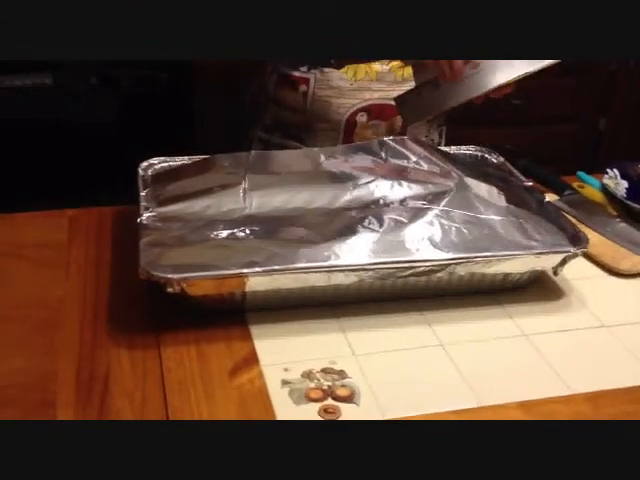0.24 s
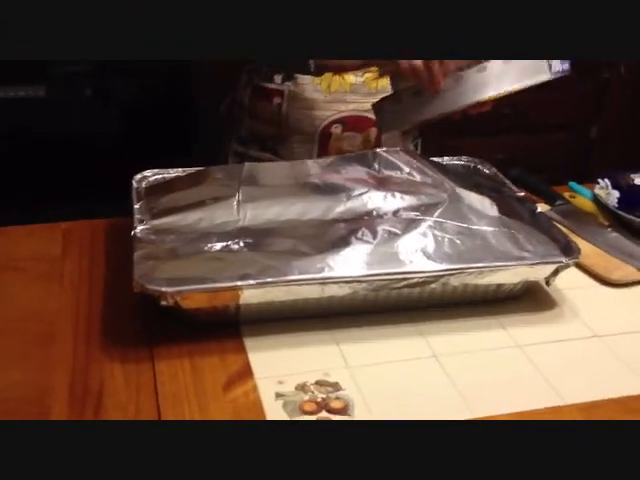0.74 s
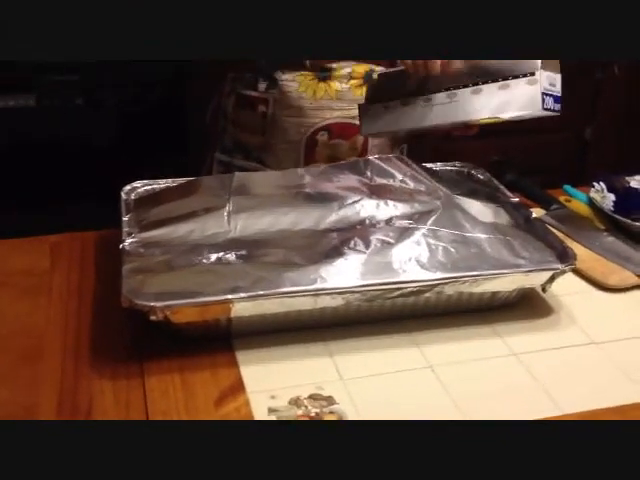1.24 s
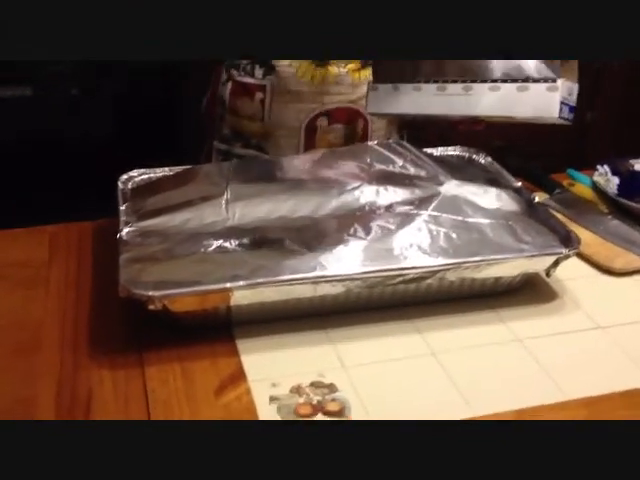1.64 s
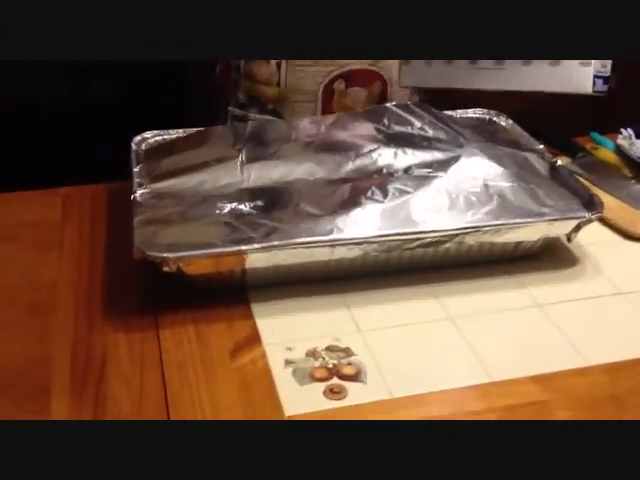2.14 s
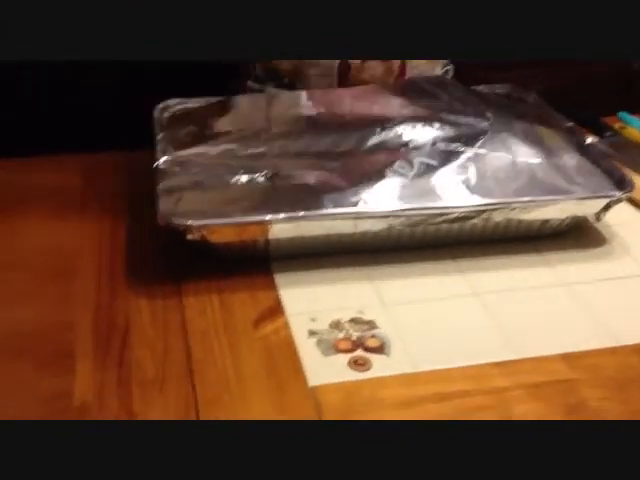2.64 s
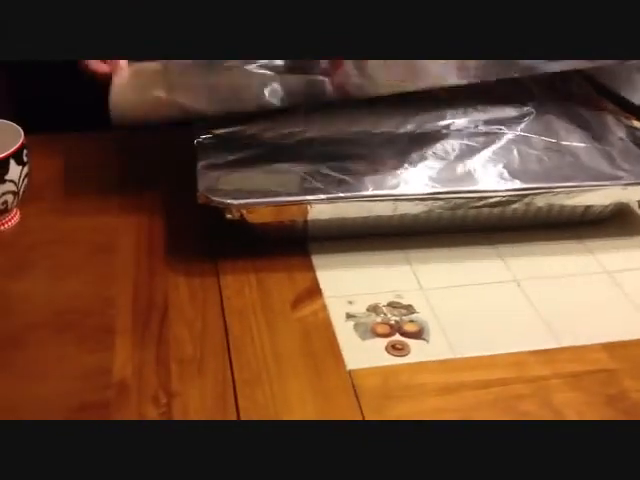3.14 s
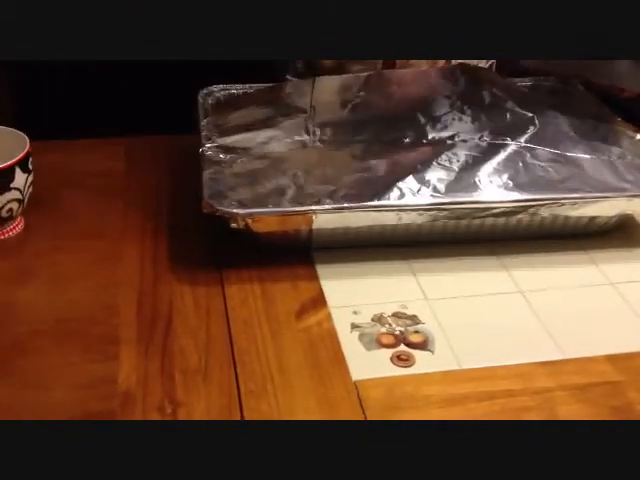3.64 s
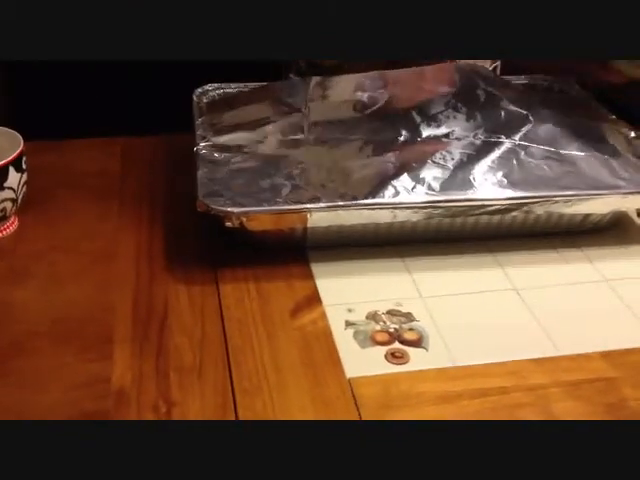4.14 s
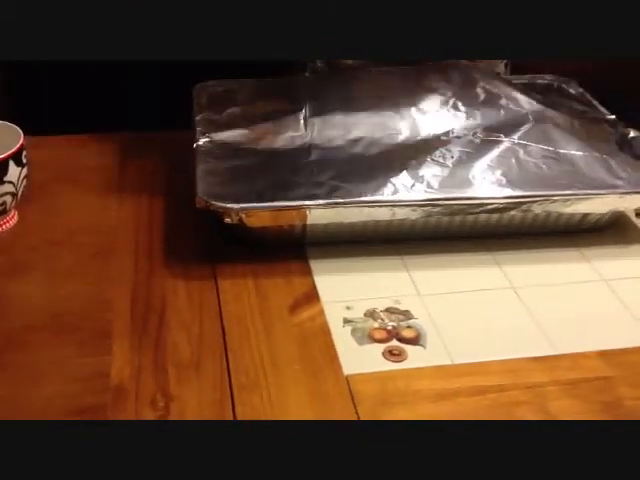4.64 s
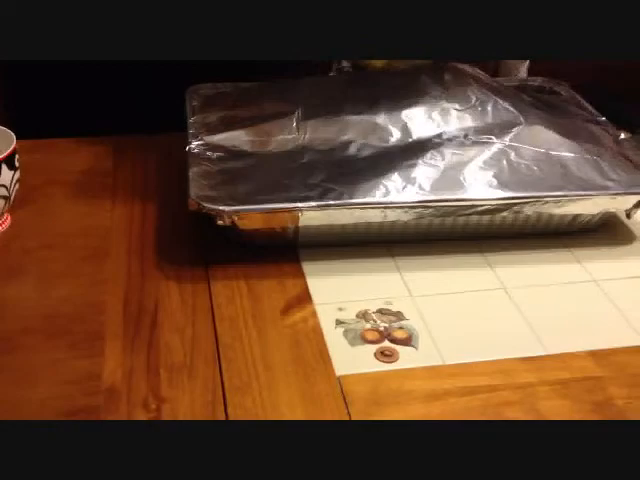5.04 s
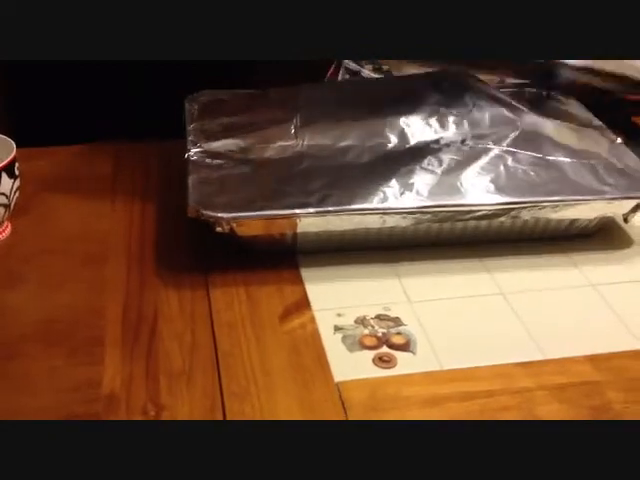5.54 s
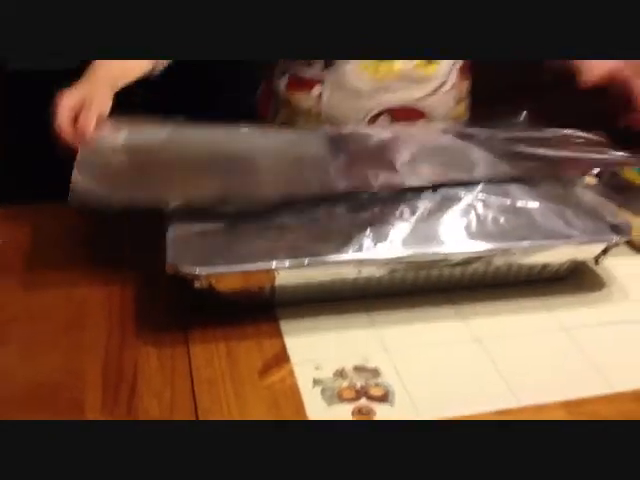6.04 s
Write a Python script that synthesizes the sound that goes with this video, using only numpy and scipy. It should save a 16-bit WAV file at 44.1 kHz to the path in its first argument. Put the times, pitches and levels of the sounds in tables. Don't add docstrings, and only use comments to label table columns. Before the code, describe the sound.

Faint cardboard ticks and fumbling, then aluminium foil hisses off its roll and is shaken in bright, crackling bursts in a small hard kitchen.

```python
import sys
import numpy as np
from scipy import signal
from scipy.fft import rfft, irfft, dct, next_fast_len
from scipy.io import wavfile
from scipy.ndimage import uniform_filter1d

SR = 44100
rng = np.random.default_rng(int(sys.argv[2]) if len(sys.argv) > 2 else 0)


def pcm_store(signal):
    levels = np.round(np.clip(np.atleast_2d(signal), -1, 1) * 32767)
    wavfile.write(sys.argv[1], SR, levels.astype(np.int16).T)


def field_ratio(decibels):
    return 10 ** (np.asarray(decibels, dtype=float) / 20)


N = 277830

# (time [s], crackle level [dB])
PULL = [(0, -68), (.22, -68), (.5, -57), (.65, -57), (.74, -65), (.95, -55), (1.07, -69), (1.23, -58),
        (1.385, -52), (1.45, -38), (1.56, -28), (2.15, -22.5), (2.37, -23.5), (2.45, -28.5), (2.7, -33),
        (3.08, -35), (5.1, -37), (6.3, -35)]
# (peak time [s], crackle level [dB], rise by 10 dB [s], fall by 10 dB [s],
# sheet body re crackle [dB])
FUMBLES = [
    (0, -45, .02, .022, 1),
    (.096, -50, .012, .012, -6),
    (.372, -42, .02, .06, -2),
    (.79, -47, .025, .1, -4),
    (.848, -38, .01, .04, -3),
    (1.11, -46, .006, .03, -7),
    (1.3, -58, .15, .15, 9),
    (1.398, -30, .008, .06, -5),
]
# (peak time [s], crackle level [dB], rise by 10 dB [s], fall by 10 dB [s],
# sheet body re crackle [dB])
SHAKES = [(1.9, -26, .02, .15, -10), (2.165, -24, .025, .06, -10), (2.56, -31, .1, .15, -8),
          (3.21, -23.5, .06, .15, -12), (3.306, -22, .04, .05, -14), (3.4, -22.5, .1, .08, -12),
          (3.6, -15, .055, .1, -11.5), (3.746, -26, .07, .25, -7), (3.93, -25, .1, .15, -10),
          (4.094, -17.5, .2, .15, -12), (4.235, -20, .1, .095, -11), (4.4, -25.5, .02, .2, -13),
          (4.58, -18, .25, .11, -13), (4.74, -13.5, .035, .15, -7.5), (4.83, -14.5, .1, .12, -9),
          (4.936, -17.5, .1, .085, -12), (5.17, -35, .03, .06, -10), (5.27, -29.5, .06, .12, -11),
          (5.39, -28.5, .015, .12, -10), (5.55, -26, .05, .3, -9), (5.75, -29, .2, .15, -9),
          (5.95, -23, .08, .11, -12), (6.23, -26, .12, .6, -12)]
# (frequency [Hz], density [dB per Hz])
CRACKLE_SPECTRUM = [(1760, -41), (3000, -8.5), (4330, -2), (5690, 1.5), (8180, -2.5), (10000, -12.5),
                    (13000, -51), (22000, -120)]
# (frequency [Hz], density [dB per Hz])
BODY_SPECTRUM = [(280, -48.5), (480, -21), (590, -9), (652, -15.5), (710, -8.5), (1040, -6), (1890, 2.5),
                 (3000, -6.5), (3900, -32), (6600, -120)]
# (frequency [Hz], density [dB per Hz])
WOBBLE_SPECTRUM = [(90, -38.5), (140, -14), (200, -3.5), (280, -1.5), (360, 0.5), (450, -5), (520, -17),
                   (800, -50)]
# (time [s], treble lift [dB])
FACING = [(.3, -2), (.8, 3.5), (1.45, 4.5), (1.9, 2.5), (2.4, .5), (3.0, 1.5), (3.35, -1), (3.7, .3),
          (4.7, -0.5), (5.3, 0.7)]
DIP_DB = (-5.5, 0., 2.5, 0.)
DIP_S = (1.3, 1.6, 2.9, 3.8)

# (time [s], peak level [dB], low part re peak [dB])
TICKS = [(0.0944, -33.5, -12), (0.2478, -34, -5), (0.2828, -37, -2), (0.3072, -34, 0), (0.3521, -37, -4),
         (0.3695, -31, -6), (0.4724, -37, -15), (0.4968, -32, 1), (0.5307, -39, -10), (0.5707, -31, 3),
         (0.602, -35, 1), (0.634, -37, 3), (0.6594, -28, 2.5), (0.7667, -39, -8), (0.7903, -30.5, -11),
         (0.8145, -30, -7), (0.845, -23, -10), (0.9562, -34, -11), (1.1064, -34, -10), (1.191, -40.5, -13),
         (1.225, -43, -1), (1.2875, -42, -5), (1.3124, -41, -12), (1.3962, -27, -3)]
# (time [s], peak level [dB], low part re peak [dB])
SNAPS = [(1.4701, -27, -12), (1.497, -21.5, -14), (1.6566, -18, -25), (1.7609, -18.5, -21),
         (3.1803, -21, -8), (3.4989, -20.5, -20), (3.5164, -20.5, -11), (3.5528, -12.5, -20.5),
         (3.9182, -12, -21), (4.6927, -10.5, -8), (4.7252, -7, -11), (5.1507, -21, -29), (5.2342, -22, -20),
         (5.302, -30.5, 0), (5.3822, -21, -27), (5.434, -17, -14.5), (5.5238, -26, -22), (5.5423, -15, -30),
         (5.7354, -20, -21)]
# (frequency [Hz], density [dB per Hz])
SNAP_BRIGHT = [(1760, -32.5), (3000, -4), (4470, 3.5), (8380, -13.5), (9370, -14.5), (10000, -3.5),
               (13000, -54), (22000, -120)]
# (frequency [Hz], density [dB per Hz])
SNAP_LOW = [(290, -42), (500, -7.5), (1120, -3.5), (1540, -11), (1680, -1.5), (3000, -20.5), (3900, -56.5),
            (6600, -120)]
# (time [s], peak level [dB], pitch [Hz], t60 [s])
FLOPS = [(0.814, -40, 377, 0.12), (4.039, -36, 334, .1), (4.69, -33.5, 342, .12), (4.83, -31, 300, .12),
         (5.209, -39.5, 232.4, 0.09), (5.304, -32, 428, 0.15), (5.374, -29, 354, 0.1),
         (5.6, -38, 300, 0.13), (5.659, -34, 331, 0.118), (5.72, -38.5, 315.5, 0.14),
         (5.781, -35.5, 234, 0.12)]

# (frequency [Hz], t60 [s])
KITCHEN_T60 = [(300, 0.44), (2000, 0.39), (6000, 0.12), (10000, 0.2)]
# (frequency [Hz], level [dB])
HUM = [(118.6, -67.5), (213.6, -52)]
# (frequency [Hz], density [dB per Hz])
ROOM_TONE = [(24, -74.5), (40, -35.5), (96, -34), (156, -9.5), (211, -5.5), (279, -16), (452, -8.5),
             (520, -11.5), (1980, -22), (2870, -23.5), (4890, -23.5), (8120, -29.5), (10000, -64.5),
             (13000, -93), (22000, -120)]

# (time [s], step re block level [dB])
COARSENESS = [(1.1, -22), (1.6, -16), (2.9, -9), (4.9, -5), (5.1, -2.5)]
# (frequency [Hz], level [dB])
STEP_TILT = [(60, 0), (150, 0), (300, -2), (8000, -2)]
# (frequency [Hz], level [dB])
MASKING = [(150, 0), (300, 5), (600, 8), (1000, 10), (3300, 10.5), (4000, 6)]
EDGE_HZ = (9000, 10750, 10800, 10050)
EDGE_S = (0, .5, 1.6, 2.1)
TREBLE_HZ = (8600, 11200, 12000)
# (crackle level [dB], hiss level [dB])
HISS_FOLLOW = [(-74, -83), (-37, -47), (-21, -23.5), (-14, -21)]
# (time [s], level [dB])
HISS_BURSTS = [
    (0.1794, -73),
    (0.4978, -44),
    (0.5701, -63),
    (0.6584, -62),
    (0.9994, -68),
    (1.1039, -57),
]


def evened(x):
    return x / np.sqrt(np.mean(x ** 2) + 1e-20)


def read(points, hz):
    f, value = np.transpose(points)
    return np.interp(np.log(hz + 1), np.log(f + 1), value)


def at_times(points, t):
    return np.interp(t, *np.transpose(points))


def coloured(x, spectrum):
    hz = abs(np.fft.fftfreq(8192, 1 / SR))
    log_gain = np.log(field_ratio(np.maximum(read(spectrum, hz), -100)))
    phase = -signal.hilbert(log_gain).imag
    taps = np.fft.ifft(np.exp(log_gain + 1j * phase)).real[:4096]
    return signal.oaconvolve(x, taps / np.linalg.norm(taps))[:N]


def band(x, lo_hz, hi_hz):
    size = next_fast_len(N + SR)
    f = np.fft.rfftfreq(size, 1 / SR)
    return irfft(rfft(x, size) * (f > lo_hz) * (f < hi_hz), size)[:N]


def foil():
    wobble_db, wobble_per_db, rest_db = -19.5, 0.28, -63.0
    swell_db, swell_s = -13.0, 0.03
    crackle_db, body_db = handling()
    t = np.arange(N) / SR
    fine = creases(per_s=4000, spread_db=0.0, clump_db=0.54, ring_t60=0.005)
    coarse = creases(per_s=1200, spread_db=2.0, clump_db=0.76, ring_t60=0.03)
    crackle = coloured(fine + 0.6 * coarse, CRACKLE_SPECTRUM) * field_ratio(crackle_db)
    body = coloured(0.74 * fine + 0.69 * coarse, BODY_SPECTRUM) * field_ratio(body_db)

    swells = sum(field_ratio(db + swell_db) * np.exp(-((t - s) / swell_s) ** 2) for s, db, *_ in FLOPS)
    shaken = field_ratio(body_db + wobble_db + wobble_per_db * (body_db + 24.5))
    wobble = coloured(coarse, WOBBLE_SPECTRUM) * (shaken + field_ratio(rest_db) + swells)
    return field_ratio(-2.0) * facing(crackle + body + wobble, crackle_db)


def handling():
    body_re_crackle_db, slack_gain, firm_db = -8.5, -0.1, -34.5
    t = np.arange(0, N, 32) / SR
    pull_db = at_times(PULL, t)
    slack_db = np.minimum(pull_db - firm_db, 0)
    crackle = field_ratio(2 * pull_db)
    body = field_ratio(2 * (pull_db + body_re_crackle_db + slack_gain * slack_db))
    for s, db, rise_s, fall_s, body_db in FUMBLES + SHAKES:
        distance = np.where(t < s, (s - t) / rise_s, (t - s) / fall_s)
        stroke = field_ratio(2 * (db - 10 * distance))
        crackle = crackle + stroke
        body = body + stroke * field_ratio(2 * body_db)
    return [np.interp(np.arange(N) / SR, t, 10 * np.log10(power)) for power in (crackle, body)]


def creases(per_s, spread_db, clump_db, ring_t60):
    wander = uniform_filter1d(rng.standard_normal(N), size=500)
    clumps = evened(uniform_filter1d(wander, size=300))
    size = field_ratio(spread_db * np.minimum(rng.exponential(1, N), 4.2) + clump_db * clumps)
    size *= rng.random(N) < per_s / SR
    fade = field_ratio(-60 / ring_t60 / SR) ** 2
    power = signal.lfilter([1], [1, -fade], size ** 2)
    return evened(rng.standard_normal(N) * np.sqrt(power))


def facing(x, crackle_db):
    t = np.arange(N) / SR
    effort_db = uniform_filter1d(crackle_db, size=15000)
    top_db = np.maximum(0.29 * (effort_db + 24.5), -4.0) + at_times(FACING, t)
    dip_db = np.interp(t, DIP_S, DIP_DB)
    top = (field_ratio(top_db) - 1) * band(x, 7000, 12000)
    dip = (field_ratio(dip_db) - 1) * band(x, 2500, 3500)
    return x + top + dip


def snaps():
    length = 6000
    bright, low, flops = np.zeros((3, N + length))
    t = np.arange(length) / SR
    tail = field_ratio(-60 * t / 0.058)
    ring = (field_ratio(-60 * t / 0.018) + 0.5 * tail) * (1 - np.exp(-t / 0.0004))
    tick = field_ratio(-60 * t / 0.0035) + 0.18 * tail
    for s, db, low_db in TICKS + SNAPS:
        at = round(s * SR)
        rattle = rng.standard_normal(length)
        bright[at:at + length] += field_ratio(db - 10.0) * rattle * ring
        low[at:at + length] += field_ratio(db + low_db - 4.5) * rattle * tick

    rise = 1 - np.exp(-t / 0.0021)
    for s, db, hz, t60 in FLOPS:
        at = round(s * SR)
        flops[at:at + length] += field_ratio(db - 5.0 - 60 * t / t60) * rise * np.sin(2 * np.pi * hz * t)
    return coloured(bright, SNAP_BRIGHT) + coloured(low, SNAP_LOW) + flops[:N]


def kitchen(x):
    taps = np.zeros(SR // 2)
    at = np.arange(200, SR // 2 - 20, 20)
    taps[at + rng.integers(0, 20, len(at))] = rng.choice([-1., 1.], len(at))
    hz, t, z = signal.stft(taps, SR, nperseg=256)
    decay = field_ratio(-60 * t / read(KITCHEN_T60, hz)[:, None])
    tail = signal.istft(z * decay, SR, nperseg=256)[1]
    return signal.fftconvolve(x, tail / np.linalg.norm(tail))[:N]


def refrigerator():
    waver = evened(uniform_filter1d(rng.standard_normal(N), size=4000))
    turns = np.cumsum(1 + 0.015 * waver) / SR
    hum = sum(np.sqrt(2) * field_ratio(db + 0.33 * waver) * np.sin(2 * np.pi * hz * turns) for hz, db in HUM)
    return hum + field_ratio(-53.5) * coloured(rng.standard_normal(N), ROOM_TONE)


def scene():
    near = foil() + snaps()
    return np.tile(near + field_ratio(-9.5) * kitchen(near) + refrigerator(), (2, 1))


def camera_detail(x, size=2048):
    window = np.sin(np.pi * (np.arange(2 * size) + 0.5) / (2 * size))
    count = N // size + 2
    padded = np.concatenate([np.zeros(size), x, np.zeros(3 * size)])
    lapped = padded[np.arange(count)[:, None] * size + np.arange(2 * size)] * window
    a, b, c, d = np.split(lapped, 4, axis=1)
    z = dct(np.hstack([-c[:, ::-1] - d, a - b[:, ::-1]]), type=4, norm="ortho")

    hz, t = (np.arange(size) + 0.5) * SR / 2 / size, np.arange(count) * size / SR
    coarse_hz, top_hz, _ = TREBLE_HZ
    above_edge = hz > np.interp(t, EDGE_S, EDGE_HZ)[:, None]
    step_db = at_times(COARSENESS, t)[:, None]
    block_db = 10 * np.log10((z ** 2).mean(1, keepdims=True) + 1e-12)
    loud_db = uniform_filter1d(block_db, size=5, axis=0)
    under_db = np.clip(12.5 - 0.8 * (loud_db + 25 - 0.8 * step_db), 5.5, 12.8 + 0.11 * step_db)
    treble_db = np.where(above_edge, 25 - under_db, under_db)

    z *= np.where(above_edge, field_ratio(-10.0), 1)
    local = np.sqrt(abs(uniform_filter1d(z ** 2, size=40, axis=1)) + 1e-20)
    block = np.sqrt((z ** 2).mean(1, keepdims=True))
    step = block * field_ratio(read(STEP_TILT, hz) + step_db) + 1e-9
    step = np.maximum(step, local * field_ratio(step_db + read(MASKING, hz)))
    step = np.where(hz > coarse_hz, local * field_ratio(treble_db), step)
    z = np.round(z / step) * step * (hz < top_hz)

    low, high = np.split(dct(z, type=4, norm="ortho"), 2, axis=1)
    blocks = np.hstack([high, -high[:, ::-1], -low[:, ::-1], -low]) * window
    return (blocks[1:, :size] + blocks[:-1, size:]).ravel()[:N]


def camera_hiss():
    hiss, t = rng.standard_normal(N), np.arange(N) / SR
    crackle_power = uniform_filter1d(field_ratio(2 * handling()[0]), size=3500)
    slow_db = 10 * np.log10(abs(crackle_power) + 1e-12)
    hiss_db = at_times(HISS_FOLLOW, slow_db) + 1.3 * at_times(FACING, t)
    hiss_db = hiss_db + 1.6 * evened(uniform_filter1d(rng.standard_normal(N), size=1500))
    wide_db = hiss_db + 0.33 * (slow_db - hiss_db) - 19.0 + 0.3 * at_times(COARSENESS, t)
    narrow = hiss * (field_ratio(hiss_db) + field_ratio(-74.0))
    wide = hiss * (field_ratio(wide_db) + field_ratio(-80.0))
    bursts = hiss * sum(field_ratio(db - 0.5) * np.exp(-((t - s) / 0.0064) ** 2) for s, db in HISS_BURSTS)
    droop = wide - 0.55 * band(wide, 15150, 16000)
    _, from_hz, strong_to_hz = TREBLE_HZ
    return band(narrow, from_hz, strong_to_hz) + band(droop, strong_to_hz, 15620) + band(bursts, 7200, 14600)


def roll_off(x):
    return signal.sosfilt(signal.butter(12, 15690, fs=SR, output="sos"), x)


def record(dry):
    bass_cut = signal.butter(4, 70, "high", fs=SR, output="sos")
    mic = signal.sosfilt(bass_cut, dry[0])
    mic = 1.3 * np.tanh(mic / 1.3)
    mix = np.tile(camera_detail(mic) + camera_hiss(), (2, 1))
    return roll_off(mix)


dry = scene()
out = record(dry)
pcm_store(out)
```